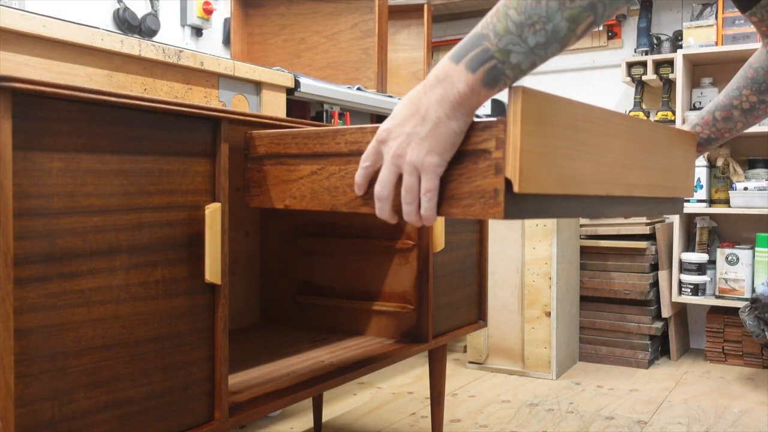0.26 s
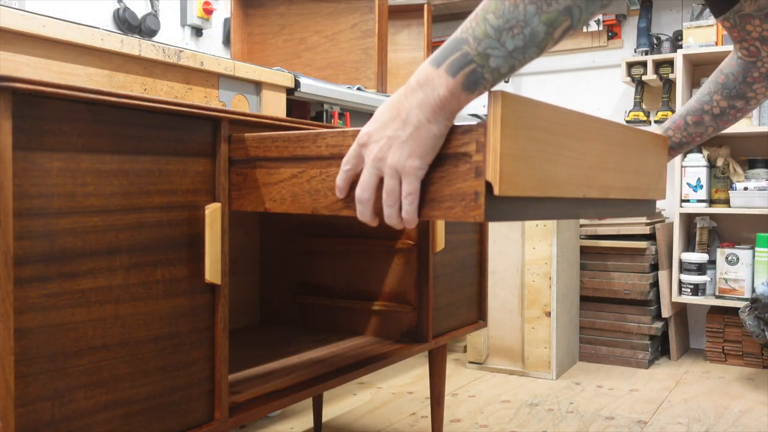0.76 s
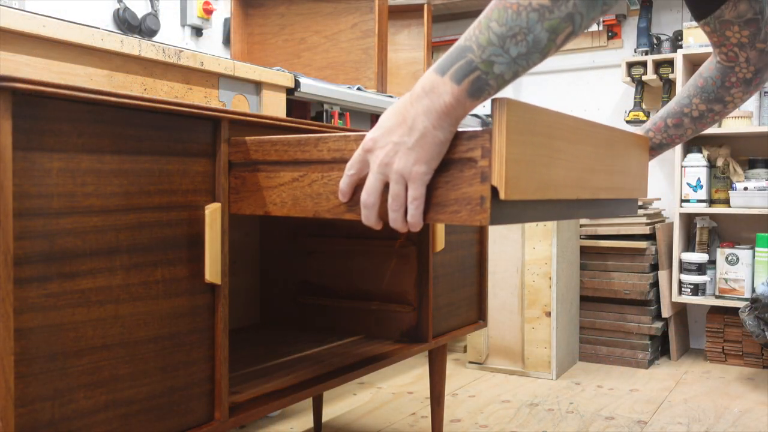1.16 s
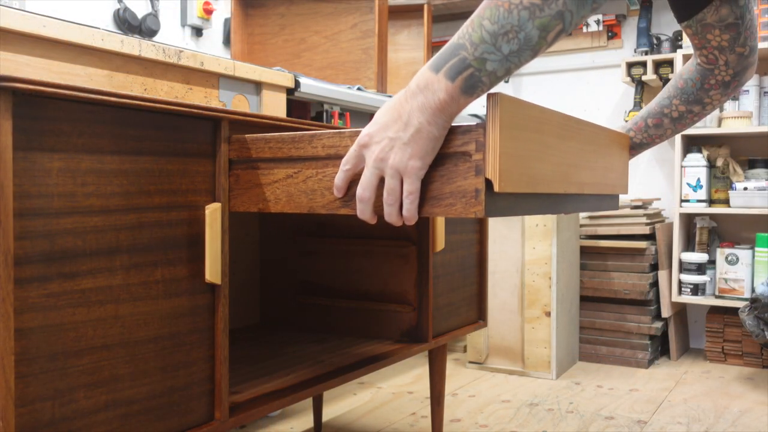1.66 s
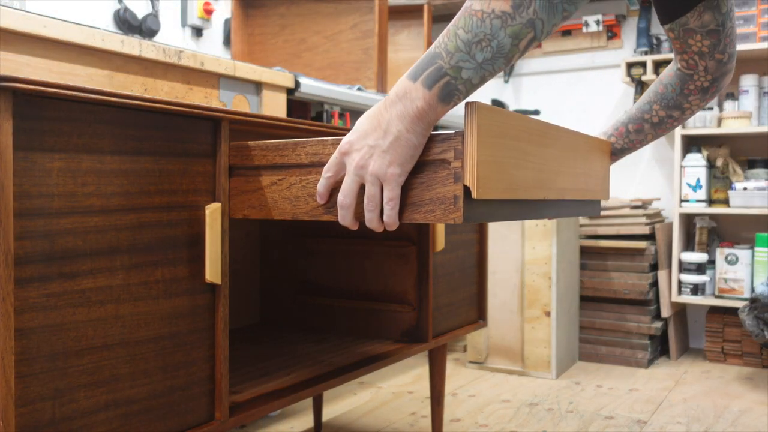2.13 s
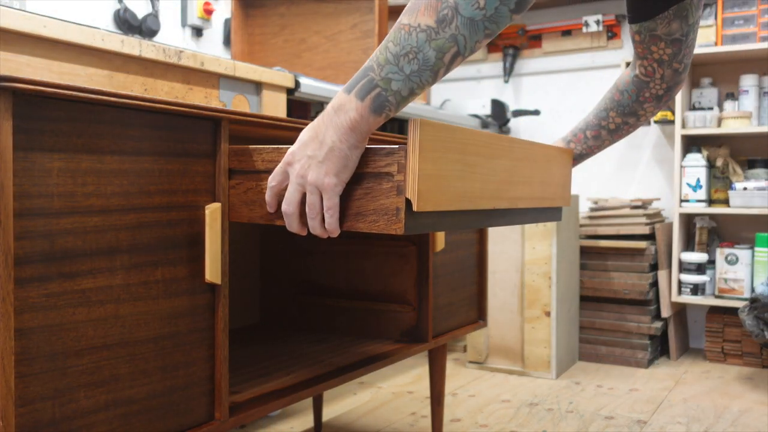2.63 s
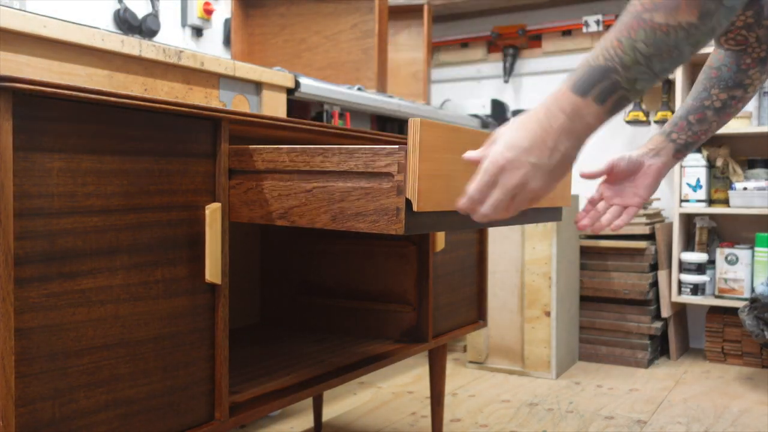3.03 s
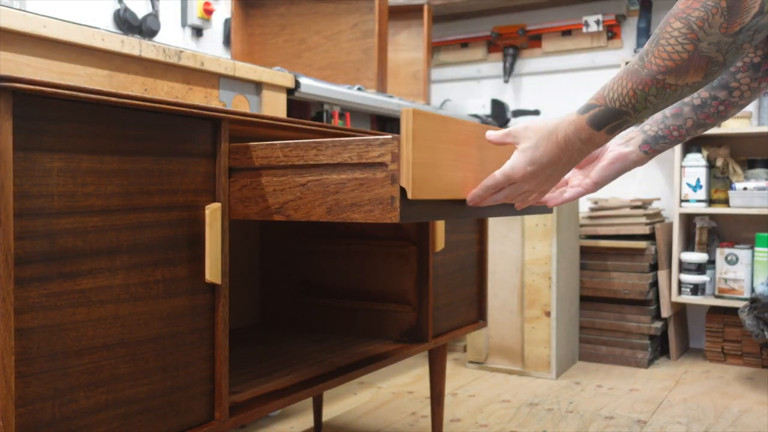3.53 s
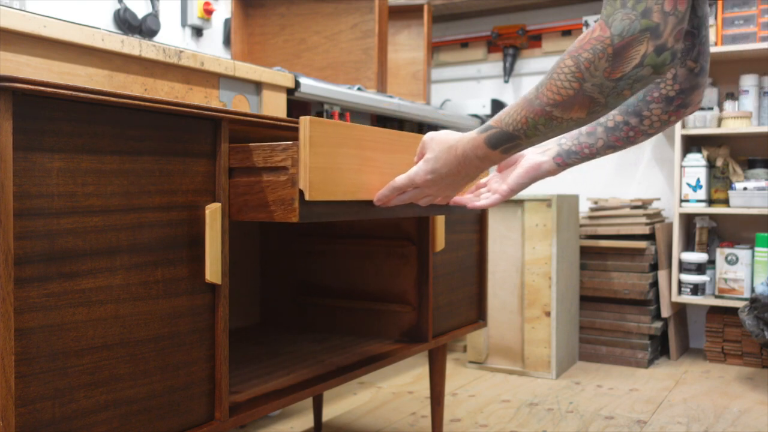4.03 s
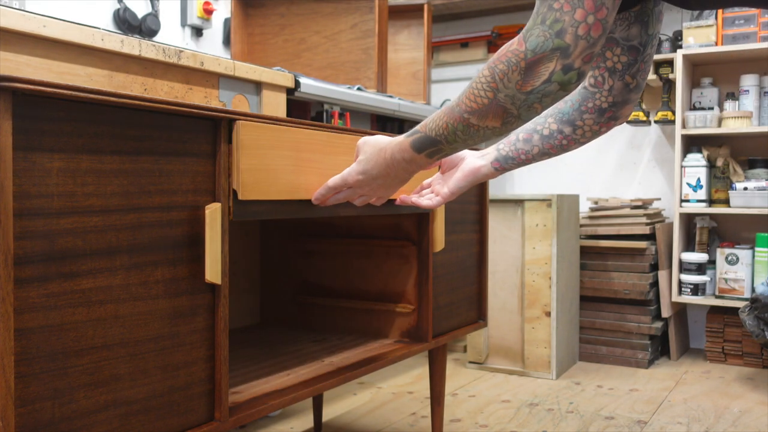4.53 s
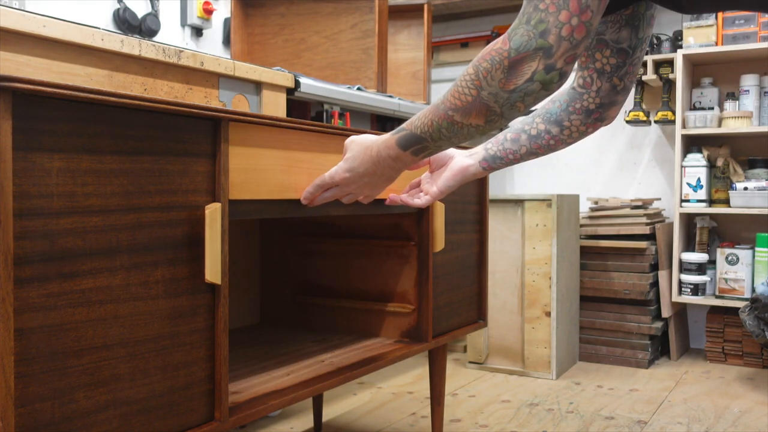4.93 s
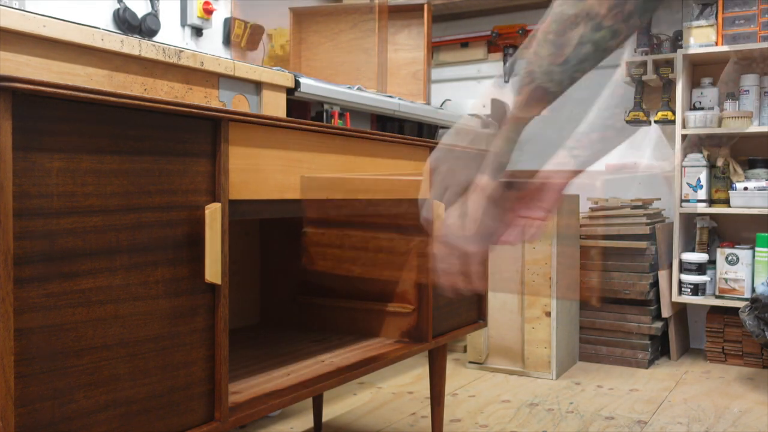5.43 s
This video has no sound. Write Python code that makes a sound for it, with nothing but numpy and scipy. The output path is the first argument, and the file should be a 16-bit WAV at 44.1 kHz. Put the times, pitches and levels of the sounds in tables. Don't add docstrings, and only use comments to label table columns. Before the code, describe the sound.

Hollow wooden knocks and dry, squeaky scraping as a drawer is fitted and slid shut, then faint finger and wood touches over quiet room hum.

```python
import sys
import numpy as np
from scipy import signal
from scipy.fft import rfft, irfft
from scipy.io import wavfile

SR = 44100
rng = np.random.default_rng(int(sys.argv[2]) if len(sys.argv) > 2 else 0)


def inscribe(sig):
    pcm = np.round(np.clip(np.atleast_2d(sig).T, -1, 1) * 32767)
    wavfile.write(sys.argv[1], SR, pcm.astype(np.int16))


def gain_from_decibels(decibels):
    exponent = np.asarray(decibels, float) / 20
    return 10 ** exponent


N = 250488

# pitch_hz, level_db, t60_s (time to fade by 60 dB)
BODY_NOTES = [(135, -4, 0.37), (146, -14, 0.25), (171.7, -0.5, 0.13), (188, -13.5, 0.26), (242, -1, 0.18),
              (291.9, -7, 0.2), (321.6, -15.5, 0.14), (354.7, -0.5, 0.091), (420, -4, 0.12),
              (483, -0.5, 0.079)]
# pitch_hz, level_db, t60_s
PANEL_NOTES = [(581, 4, 0.02), (618.2, 0, 0.14), (691, -6, 0.1), (771, -1, 0.033), (834, -5.5, 0.032),
               (923, -7, 0.027), (979, -4, 0.044), (1098, 2.5, 0.018), (1192, -4.5, .07),
               (1260, -13, 0.025), (1492, -24, 0.061)]


def rms_one(x):
    return x / np.sqrt(np.mean(x ** 2) + 1e-30)


def at_hz(points, hz):
    table_hz, values = np.array(points)[:, 0], np.array(points)[:, 1]
    return np.interp(np.log(hz), np.log(table_hz), values)


def dull(x, hz):
    return signal.sosfilt(signal.butter(2, hz, fs=SR, output="sos"), x)


def crisp(x, low_hz, top_hz):
    r = np.exp(-2 * np.pi * top_hz / SR)
    high = signal.sosfilt(signal.butter(2, low_hz, "high", fs=SR, output="sos"), x)
    return gain_from_decibels(12.0) * signal.lfilter([(1 - r) ** 2], [1, -2 * r, r * r], high)


def resonate(x, peaks):
    click = np.eye(1, 4096)[0]
    out, answer = 0, 0
    for k, (hz, width_hz, level_db) in enumerate(peaks):
        r = np.exp(-np.pi * width_hz / SR)
        gain = (-1) ** k * gain_from_decibels(level_db) * (1 - r * r) / 2
        b = gain * np.array([1, 0, -1])
        a = [1, -2 * r * np.cos(2 * np.pi * hz / SR), r * r]
        out = out + signal.lfilter(b, a, x + 1e-18)
        answer = answer + signal.lfilter(b, a, click)
    return out / np.sqrt(np.sum(answer ** 2))


def ring(x, hz, t60):
    r = gain_from_decibels(-60 / (t60 * SR))
    b = np.sqrt((1 - r * r) / 2) * np.array([1, 0, -1])
    a = [1, -2 * r * np.cos(2 * np.pi * hz / SR), r * r]
    return signal.lfilter(b, a, x + 1e-18)


def struck(notes_of_wood, force, grain, push):
    out = 0
    for k, (hz, db, t60) in enumerate(notes_of_wood):
        shaking = np.roll(grain, 977 * k) * force[k] + push[k]
        out = out + gain_from_decibels(db) * ring(shaking, hz, t60)
    return out


def nearness(notes_of_wood, centre_hz, octaves):
    ratio = np.divide.outer(np.array(notes_of_wood)[:, 0], centre_hz)
    return -6 * (np.log2(ratio) / octaves) ** 2


def grains(per_s, spread_db):
    sizes = gain_from_decibels(spread_db * np.minimum(rng.exponential(1, N), 4))
    signs = rng.choice([-1, 1], N)
    return rms_one(sizes * signs * (rng.random(N) < per_s / SR))


def judder(rate_hz, depth_db):
    r = np.exp(-2 * np.pi * rate_hz / SR)
    wobble = signal.lfilter([1], [1, -2 * r, r * r], rng.standard_normal(N))
    return gain_from_decibels(depth_db * rms_one(wobble))


def add(force, s, levels_db, length, rise_s, ring_s=0.076):
    length, i = np.clip(length, .002, .06), round(s * SR)
    t = np.arange(min(6000, N - i)) / SR
    strength = np.sqrt(1 + ring_s / length)
    shape = (1 - np.exp(-t / rise_s)) * np.exp(-t / length) * strength
    force[:, i:i + len(t)] += np.outer(gain_from_decibels(levels_db), shape)


def hush():
    # pitch_hz, level_db (per Hz)
    colour = [(18, -76), (30, -22.5), (75, -23.5), (124, -4), (355, -5), (512, -9), (632, -2.5), (913, -9),
              (1070, -14), (1320, -11.5), (1720, -14.5), (2480, -17.5), (2680, -18.5), (3770, -21.5),
              (16000, -27)]
    hz = np.maximum(np.fft.rfftfreq(N, 1 / SR), 10)
    mid, side = rfft(rng.standard_normal((2, N))) * gain_from_decibels(at_hz(colour, hz))
    side = side * gain_from_decibels(-3) / (1 + (hz / 8000) ** 4)
    mid, side = irfft([mid, side], N)
    return gain_from_decibels(-66.5) * rms_one(mid + side * [[1], [-1]])


def workshop(x, direct_db, count=3):
    # pitch_hz, t60_s
    room_t60 = [(100, 0.6), (400, 0.59), (1200, 0.29), (3000, 0.26), (8000, 0.27), (15000, 0.35)]
    # pitch_hz, side_minus_mid_db
    side_level = [(60, -19), (110, -25), (200, -19), (380, -12), (700, -16.5), (1290, -22), (2380, -19.5),
                  (4400, -20), (8120, -26.5), (15000, -10.5)]
    turn_s, build_up_s = .2, 0.0015
    t, tails = np.arange(SR // 2) / SR, 0
    band_edges = 40 * 2 ** np.arange(0, 9.1, .5)
    white = rng.standard_normal((count + 1, len(t)))
    for k, (low, high) in enumerate(zip(band_edges, band_edges[1:])):
        band = signal.sosfilt(signal.butter(2, [low, high], "band", fs=SR, output="sos"), white)
        hz = np.sqrt(low * high)
        t60 = at_hz(room_t60, hz)
        band[-1] *= gain_from_decibels(at_hz(side_level, hz))
        tails = tails + (-1) ** k * band * gain_from_decibels(-60 * t / t60) / np.sqrt(t60)
    tails = tails * (1 - np.exp(-t / build_up_s))
    tails = tails / np.sqrt(np.sum(tails[0] ** 2))
    turn = np.pi * (np.arange(N) / SR / turn_s + np.arange(count)[:, None] / count)
    shares = np.vstack([np.sqrt(2 / count) * np.sin(turn), np.ones(N)])
    wet = signal.fftconvolve(x * shares, tails, axes=1)[:, :N]
    side = dull(wet[-1], hz=10480) * [[1], [-1]]
    return gain_from_decibels(direct_db) * x + wet[:-1].sum(axis=0) + side


def boom():
    # start_s, level_db
    shudders = [(.87, -55), (1.4, -58), (1.71, -47), (1.86, -50), (1.98, -56), (2.25, -47.5), (2.54, -37.5),
                (2.69, -49), (2.8, -60.5), (3.47, -68), (3.58, -49), (3.68, -57), (3.8, -39), (3.999, -74),
                (4.94, -46.5), (5.18, -59.5), (5.51, -53.5)]
    # pitch_hz, width_hz, level_db
    boards = [(52.3, 8.7, -10.5), (65.7, 4.9, 0.5), (105.4, 6.7, 4.5)]
    rise_s, t60_s, rest_db = 0.019, 0.49, -85
    t, level = np.arange(N) / SR, gain_from_decibels(rest_db)
    for s, db in shudders:
        since = np.maximum(t - s, 0)
        level = level + gain_from_decibels(db + 1.5 - 60 * since / t60_s) * (1 - np.exp(-since / rise_s))
    shaken = rms_one(resonate(rng.standard_normal(N), boards)) * level
    return signal.sosfilt(signal.butter(2, [48, 120], "band", fs=SR, output="sos"), shaken)


def squeak():
    # start_s, length_s, pitch_hz, level_db
    squeaks = [
        (1.5, .1, 1165, -59),
        (1.593, 0.085, 1190, -50),
        (2.572, 0.028, 1044, -34),
        (5.606, .12, 1985, -68.5),
    ]
    t, out = np.arange(N) / SR, 0
    wavered = np.cumsum(judder(rate_hz=150, depth_db=.45)) / SR
    for s, length, hz, db in squeaks:
        phase = 2 * np.pi * hz * wavered
        swell = np.sin(np.pi * np.clip((t - s) / length, 0, 1)) ** 2
        out = out + gain_from_decibels(db) * swell * (np.sin(phase) + 0.099 * np.sin(0.87 * phase))
    return out * judder(rate_hz=70, depth_db=4.5)


def buzz(grain):
    # start_s, level_db, length_s
    buzzes = [(0.813, -41.5, 0.027), (0.917, -56.5, 0.053), (1.7176, -51, 0.028), (1.752, -52, 0.02),
              (1.883, -46.5, 0.013), (1.957, -46, 0.041), (2.231, -39, 0.0053), (2.285, -43.5, 0.012),
              (2.568, -65, 0.0083), (5.64, -65.5, 0.025)]
    # pitch_hz, width_hz, level_db
    groove = [(2890, 320, 1), (3980, 200, -2.5), (4540, 330, -0.5), (5790, 240, -13)]
    force = np.zeros((1, N))
    for s, db, length in buzzes:
        add(force, s, [db - 7], length, rise_s=0.00074)
    return resonate(grain * force[0], groove)


def catches():
    # start_s, level_db, length_s
    rough_spots = [(0.798, -52, 0.047), (1.721, -53, 0.016), (1.845, -56, 0.017), (1.97, -33, 0.03),
                   (2.246, -67.5, 0.013), (3.628, -43, 0.013), (3.82, -64, 0.011), (3.896, -44, 0.027),
                   (4.046, -60, 0.02), (4.12, -46, 0.0073), (4.205, -63, 0.015), (4.932, -61, 0.063)]
    hiss_db, panel_db = -8.5, -15
    force = np.zeros((3, N))
    for s, db, length in rough_spots:
        add(force, s, [db, db + hiss_db, db + panel_db], length, rise_s=0.01)
    return force


def sliding():
    # start_s, scrape_db (sliding speed), rumble_db (weight on the wood)
    feeling_in = [(1.4, -83, -48), (1.474, -73, -58), (1.62, -63, -53), (1.706, -57, -47.5),
                  (1.754, -71.5, -28), (1.79, -73.5, -86), (1.822, -51.5, -24), (1.894, -65, -49),
                  (1.97, -56.5, -46.5)]
    # start_s, scrape_db, rumble_db
    first_push = [(2.142, -51, -28.5), (2.2, -57, -27), (2.302, -44.5, -38.5), (2.48, -42.5, -60.5),
                  (2.548, -43.5, -31.5), (2.589, -53, -30.5), (2.672, -84, -52), (2.75, -64.5, -46.5),
                  (2.949, -86.5, -62)]
    # start_s, scrape_db, rumble_db
    second_push = [(3.45, -78, -49.5), (3.516, -68.5, -56.5), (3.598, -48, -46), (3.645, -48.5, -42),
                   (3.681, -44.5, -28), (3.74, -45.5, -26.5), (3.78, -61.5, -48), (3.81, -45, -51),
                   (3.906, -50, -43)]
    # start_s, scrape_db, rumble_db
    gliding_home = [(3.904, -58, -38), (4.018, -44, -43), (4.06, -50.5, -36.5), (4.168, -45.5, -40.5),
                    (4.235, -43.5, -44), (4.316, -53.5, -50.5), (4.544, -57.5, -54.5), (4.64, -66, -57.5),
                    (4.942, -70.5, -60.5)]
    # start_s, scrape_db, rumble_db
    fingers_leave = [(5.13, -66.5, -75), (5.2, -90, -79), (5.255, -67.5, -54.5), (5.334, -84, -67),
                     (5.4, -84.5, -79)]
    # start_s, scrape_db, rumble_db
    next_drawer = [(5.532, -69.5, -64), (5.61, -73.5, -65), (5.642, -67, -72), (5.68, -90, -83)]
    strokes = [feeling_in, first_push, second_push, gliding_home, fingers_leave, next_drawer]
    # panel_db and hiss_db (over scrape), rumble_centre_hz, panel_centre_hz
    contacts = [(12, -6.5, 232, 820), (-3.5, -7, 277, 880), (5.5, -7.5, 260, 375), (0.5, -8.5, 303, 840),
                (-3.5, -2, 210, 510), (-18, 2.5, 250, 580)]
    weight_in_panels_db, room_lag_s = -20.5, .02
    t = np.arange(N) / SR + room_lag_s
    wobble = judder(rate_hz=8.3, depth_db=0.5)
    rumble, rub = np.zeros((len(BODY_NOTES), N)), np.zeros((len(PANEL_NOTES), N))
    scrape, hiss = np.zeros(N), np.zeros(N)
    for rows, (panel_db, hiss_db, low_hz, mid_hz) in zip(strokes, contacts):
        s, speed_db, weight_db = np.transpose(rows)
        on = (t >= s[0]) & (t < s[-1])
        speed = gain_from_decibels(np.interp(t[on], s, speed_db)) * wobble[on]
        weight = gain_from_decibels(np.interp(t[on], s, weight_db)) * wobble[on]
        panel_force = gain_from_decibels(panel_db) * speed + gain_from_decibels(weight_in_panels_db) * weight
        rumble[:, on] = np.outer(gain_from_decibels(-6.0 + nearness(BODY_NOTES, low_hz, 0.78)), weight)
        rub[:, on] = np.outer(gain_from_decibels(-12.0 + nearness(PANEL_NOTES, mid_hz, 0.93)), panel_force)
        scrape[on], hiss[on] = speed, gain_from_decibels(hiss_db) * speed
    return rumble, rub, scrape, hiss


def knocks():
    # start_s, level_db, centre_hz
    thuds = [(0.815, -21.5, 180), (0.831, -20.5, 196), (1.385, -50, 135), (1.717, -28.5, 247),
             (1.806, -18, 316), (1.87, -28, 150), (1.933, -36, 320), (1.975, -13.5, 334),
             (2.007, -16.5, 279.6), (2.034, -18.5, 268), (2.061, -20, 260), (2.078, -14, 250),
             (2.197, -28.5, 250), (2.525, -26.5, 255), (2.572, -39, 228), (2.653, -44, 360),
             (2.692, -29, 151), (2.797, -35.5, 146), (3.537, -47, 293), (3.579, -36, 193),
             (3.662, -22.5, 280), (3.689, -29.5, 242), (3.782, -33, 250), (3.831, -32.5, 510),
             (4.04, -28, 317), (4.117, -29, 257), (4.954, -24.5, 303), (4.981, -25.5, 205),
             (5.03, -35, 262), (5.522, -51.5, 330)]
    # start_s, edge_db, panel_db (over edge), crack_db (over edge)
    taps = [(0.8066, -39.5, 6, -6), (0.814, -31.5, -5.5, -6), (0.827, -45, 3, 7), (0.9333, -52.5, -5, -6),
            (1.3883, -62, 12.5, -5), (1.7224, -40.5, 0, 0), (1.76, -64, -12, -19), (1.8021, -31, 2, -6),
            (1.847, -49.5, -15, 5.5), (1.928, -47.5, 10.5, -20), (1.9815, -17.5, 4.5, -2),
            (2.0143, -27, 0, -20), (2.0349, -22.5, 0, -20), (2.0604, -23, 4.5, -17), (2.0814, -38, 14, -16),
            (2.201, -45, 15, -33), (2.2722, -34, -5, -6), (2.5733, -29, -1.5, -17), (2.7537, -56, 5.5, -15),
            (3.4389, -49.5, 0, -7), (3.545, -42.5, 2, -2.5), (3.655, -37.5, 1, -24), (3.66, -33.5, 6, -29),
            (3.6765, -39.5, 7.5, -22), (3.8248, -38, 1.5, -23), (3.8861, -30.5, -3, -1),
            (4.038, -48.5, -11, 12.5), (4.9517, -43, 2.5, -11), (5.2547, -65, -22, 10),
            (5.512, -73, -10, -12)]
    thud_octaves, thud_rattle_s = 0.59, .011
    tap_centre_hz, tap_octaves, tap_rattle_s = 840, 0.54, 0.0021
    soft = np.zeros((len(BODY_NOTES), N))
    push = np.zeros_like(soft)
    hard = np.zeros((len(PANEL_NOTES) + 2, N))
    late = rng.random((len(thuds), len(BODY_NOTES)))
    for (s, db, centre_hz), lag in zip(thuds, late):
        levels_db = db - 6.5 + nearness(BODY_NOTES, centre_hz, thud_octaves)
        add(soft, s, levels_db - 8.0, thud_rattle_s, rise_s=0.0036)
        moments = ((s + 1.1 * lag * thud_rattle_s) * SR).astype(int)
        push[np.arange(len(lag)), moments] += 34.1 * gain_from_decibels(levels_db)
    panel_nearness = nearness(PANEL_NOTES, tap_centre_hz, tap_octaves)
    for s, db, panel_db, crack_db in taps:
        levels_db = db - 6 + np.r_[panel_db - 4 + panel_nearness, 0, crack_db]
        add(hard, s, levels_db, tap_rattle_s, rise_s=0.00082)
    return soft, dull(push, hz=435), hard


def scene():
    # pitch_hz, width_hz, level_db
    edge_colour = [(1494, 520, 6), (2126, 206, 7), (2360, 325, 5.5), (2930, 370, -1.5), (3480, 1680, -5.5)]
    # pitch_hz, width_hz, level_db
    runner_colour = [(1640, 506, 4.5), (2410, 208, 4.5), (2693, 370, 4), (3600, 2440, -1)]
    held_from_s, held_t60_s, held_room_db = 4.1, .2, -22
    rumble, rub, scrape, hiss = sliding()
    soft, push, hard = knocks()
    coarse, fine = grains(per_s=1500, spread_db=3.5), grains(per_s=4000, spread_db=5.5)
    rough, rough_hiss, rough_rub = catches()

    held = np.arange(N) / SR > held_from_s
    damped = [(hz, db, min(t60, held_t60_s)) for hz, db, t60 in BODY_NOTES]
    body_force = soft + rumble
    free = dull(struck(BODY_NOTES, body_force * ~held, coarse, push * ~held), hz=1230)
    shut = dull(struck(damped, body_force * held, coarse, push * held), hz=1200)

    no_push = np.zeros((len(PANEL_NOTES), 1))
    panels = dull(struck(PANEL_NOTES, hard[:-2] + rub + rough_rub, coarse, no_push), hz=3040)
    tapped = resonate(fine * hard[-2], edge_colour)
    scraped = resonate(fine * (scrape + rough), runner_colour)
    edges = dull(tapped + scraped + buzz(fine), hz=7400)
    cracks = dull(crisp(fine * hard[-1], low_hz=3430, top_hz=3760), hz=13500)
    highs = cracks + crisp(fine * (hiss + rough_hiss), low_hz=3920, top_hz=3726)

    near = gain_from_decibels(-5.5) * free + squeak()
    into_room = gain_from_decibels(-1.5) * near + gain_from_decibels(held_room_db) * shut + panels + edges + highs
    room = workshop(into_room, direct_db=-6.0)
    return near + gain_from_decibels(-4) * shut + room + boom() + hush()


def band_limit(x):
    return signal.sosfilt(signal.butter(12, 16640, fs=SR, output="sos"), x)


def record(dry):
    headroom = .45
    x = headroom * np.tanh(dry / headroom)
    x = signal.sosfilt(signal.butter(4, 48, "high", fs=SR, output="sos"), x)
    x = signal.sosfilt(signal.cheby2(12, 60, 16050, fs=SR, output="sos"), x)
    return band_limit(x)


dry = scene()
out = record(dry)
inscribe(out)
```